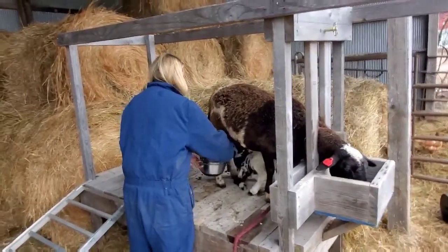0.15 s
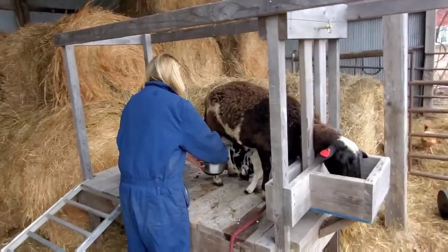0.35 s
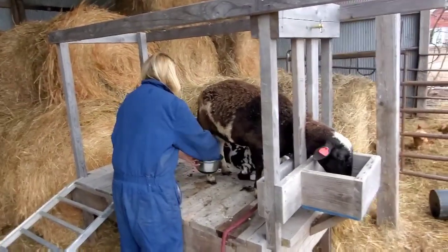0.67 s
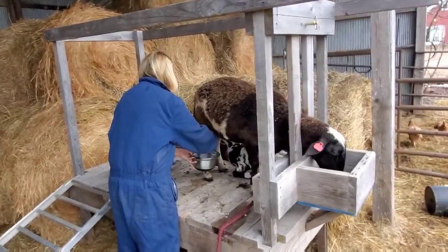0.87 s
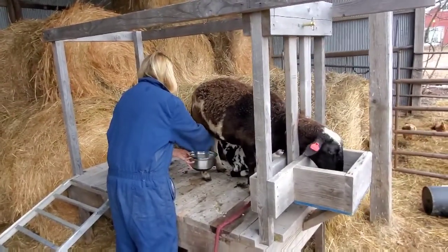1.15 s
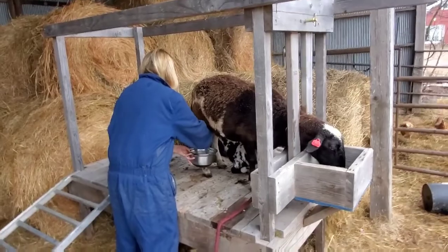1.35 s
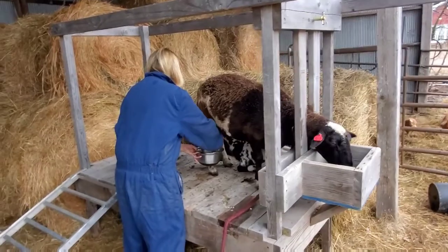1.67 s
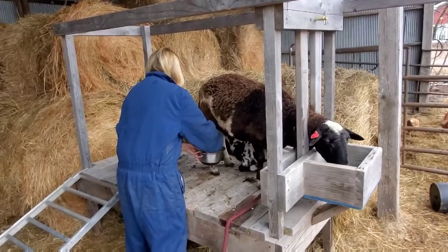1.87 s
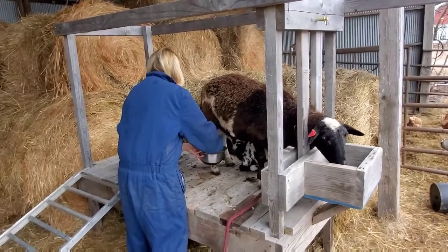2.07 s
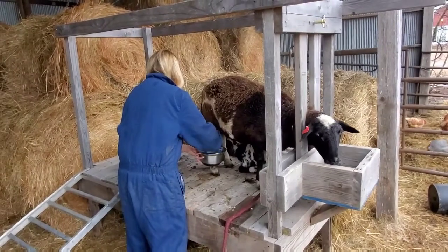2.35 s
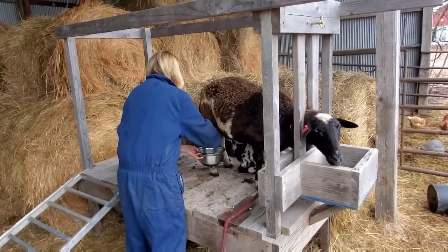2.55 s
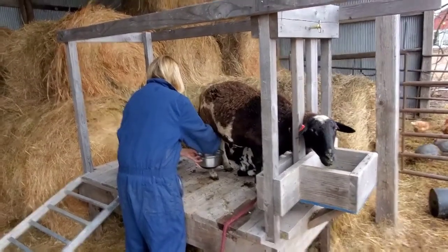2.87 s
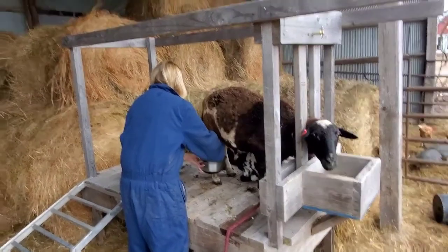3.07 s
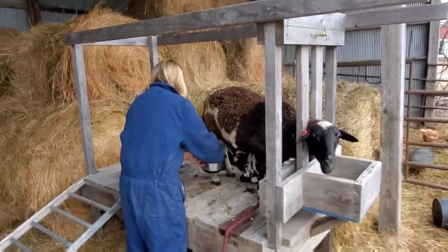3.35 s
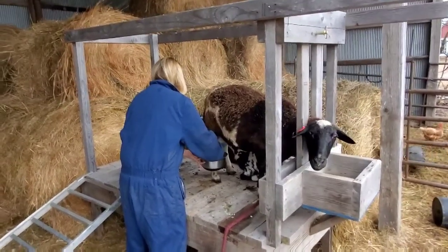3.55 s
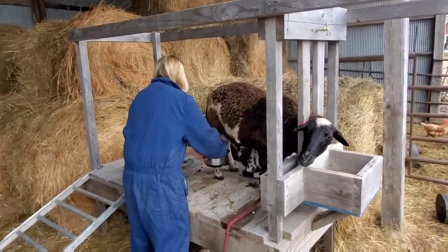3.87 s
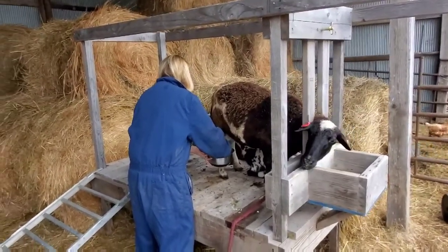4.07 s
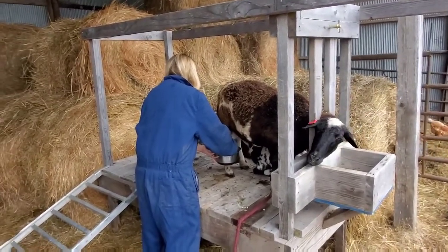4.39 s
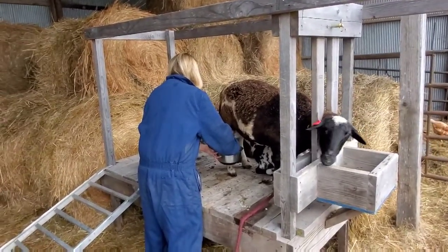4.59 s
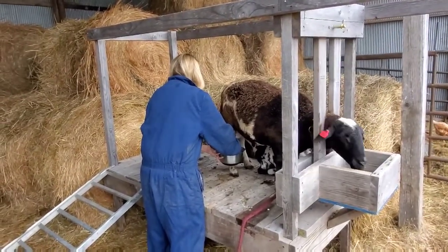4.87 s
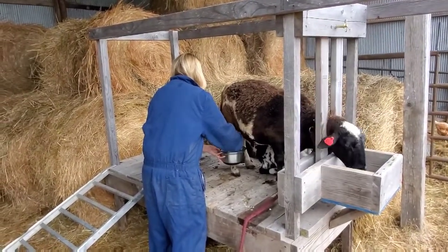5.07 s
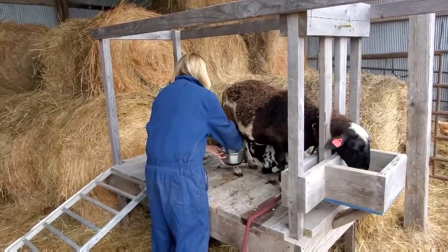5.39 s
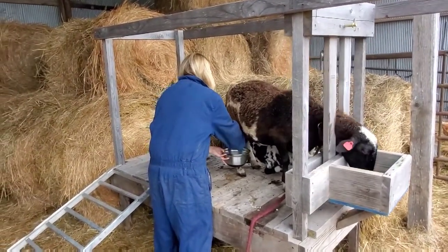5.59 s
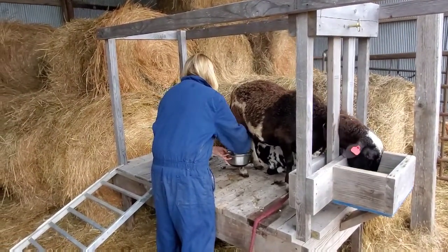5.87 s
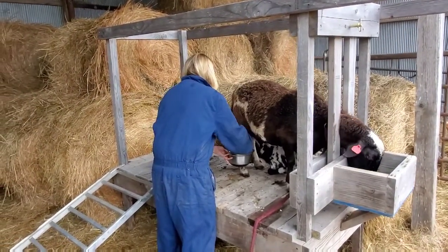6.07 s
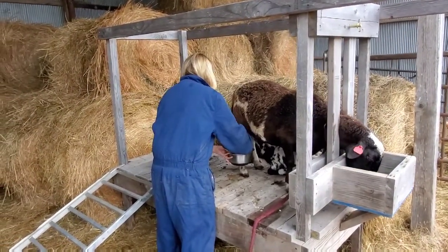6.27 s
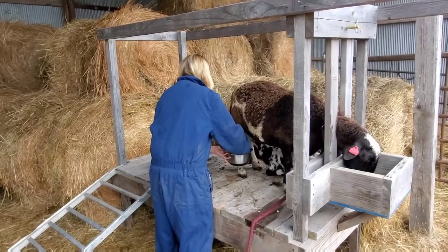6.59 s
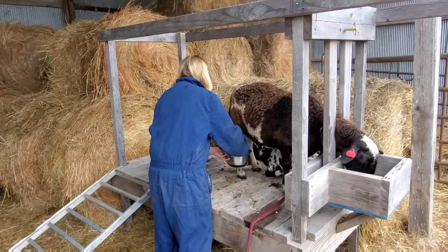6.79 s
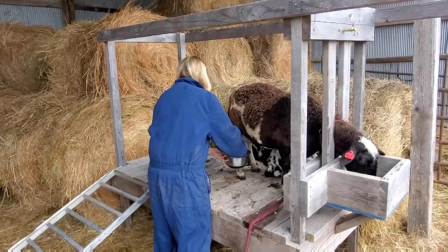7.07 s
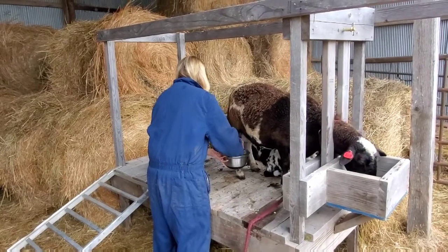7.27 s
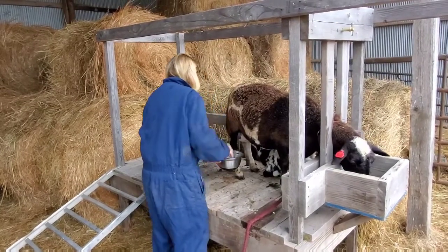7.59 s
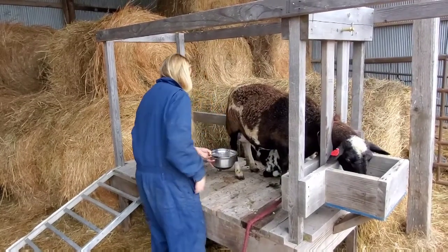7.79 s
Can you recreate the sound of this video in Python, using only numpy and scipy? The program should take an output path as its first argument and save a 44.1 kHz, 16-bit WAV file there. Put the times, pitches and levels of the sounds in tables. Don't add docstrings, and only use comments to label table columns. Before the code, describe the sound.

A quiet barn with soft air and a swelling low rumble, heard through two spaced microphones. Straw shuffles and ticks from the start. At about 0.5 to 1.3 seconds a lamb on the left gives a short, high, quavering bleat. Straw stirs and snaps follow; near 2.15 there is a brief thin squeak and a faint hiss of milk. From 2.4 to 3.1 a ewe on the right answers in a deep, rattling call that catches and restarts over a fluttering chest hum. The lamb overlaps its end with a long high cry, 3.2 to 4.4. The ewe calls again, shorter and rising, 4.4 to 4.9. The lamb's strongest, brightest bleat, with deep rapid quaver, runs 5.0 to 6.1. Then quiet: small straw ticks, and another faint milk hiss around 6.9. A shorter, fainter lamb bleat closes, 7.2 to 7.9. The tail is short, softened by hay.

```python
import sys
import numpy as np
from scipy import signal
from scipy.fft import next_fast_len
from scipy.io import wavfile
from scipy.ndimage import uniform_filter1d

SR = 44100
rng = np.random.default_rng(int(sys.argv[2]) if len(sys.argv) > 2 else 0)


def gain_from_db(level_db):
    decades = np.asarray(level_db, float) / 20
    return 10 ** decades


def wav_record(signal):
    frames = np.transpose(np.atleast_2d(signal))
    bounded = np.clip(frames, -1, 1)
    quanta = np.round(bounded * 32767).astype(np.int16)
    wavfile.write(sys.argv[1], SR, quanta)


N = 350154


def evened(x):
    return x / np.sqrt(np.mean(x ** 2) + 1e-20)


def read(points, hz):
    f, value = np.transpose(points)
    return np.interp(np.log(hz + 1), np.log(f + 1), value)


def add(mix, s, sound):
    part = mix[..., round(s * SR):][..., :sound.shape[-1]]
    part += sound[..., :part.shape[-1]]


def butter(x, order, hz, kind):
    return signal.lfilter(*signal.butter(order, hz, kind, fs=SR), x)


def resonate(x, hz, width):
    turn = np.exp(2j * np.pi * np.cumsum(hz * np.ones(len(x))) / SR)
    r = np.exp(-np.pi * width / SR)
    return 2 * (turn * signal.lfilter([(1 - r) ** 2], [1, -2 * r, r * r], x / turn)).real


def wander(n, size):
    return evened(uniform_filter1d(uniform_filter1d(rng.standard_normal(n), size), size))


def shelf(x, hz, db):
    return x + (gain_from_db(db) - 1) * butter(x, 1, hz, "high")


def ports(x, late, far):
    return np.array([x, np.concatenate([np.zeros(late), far])[:len(x)]])


# freq_hz, likeness
STEREO_LIKENESS = [(30, 0.68), (100, 0.77), (300, 0.97), (1000, 0.37), (4000, 0.086)]


def noise(spectrum, patchy_db):
    size, hop = 510, 170
    frames, hz = N // hop + 5, np.fft.rfftfreq(size, 1 / SR)
    a, b, c, d, patches = rng.standard_normal((frames, 256, 5)).T
    patches = evened(uniform_filter1d(uniform_filter1d(patches, 8, 0), 11, 1))
    same = np.clip(read(STEREO_LIKENESS, hz), -1, 1)[:, None]
    left, other = a + 1j * b, c + 1j * d
    z = np.array([left, same * left + np.sqrt(1 - same ** 2) * other])
    z *= gain_from_db(read(spectrum, hz)[:, None] + patchy_db * patches)
    return signal.istft(z, nperseg=size, noverlap=size - hop)[1][:, :N]


# freq_hz, density_db
HUSH_COLOUR = [(20, -4.5), (116, 11.5), (200, -19), (330, -5.5), (499, -5), (1530, -8), (2260, -16),
               (2530, -9), (2990, -20), (5850, -19), (9200, -33), (13500, -40), (16000, -50)]
# time_s, level_db
RUMBLE_SWELLS = [(0.0, -61), (0.37, -66), (0.62, -52.5), (0.73, -58), (2.01, -67.5), (2.81, -61),
                 (2.87, -53), (3.52, -62.5), (6.02, -58.5), (6.32, -74), (7.94, -63)]


def air():
    hush = gain_from_db(-60.5) * evened(noise(HUSH_COLOUR, patchy_db=2.2))
    rumble_colour = [(20, -24.5), (55, 6.0), (110, 5.5), (200, -7.0), (400, -24.5)]
    low = evened(noise(rumble_colour, patchy_db=3.5))
    s, db = np.transpose(RUMBLE_SWELLS)
    return hush + low * gain_from_db(np.interp(np.arange(N) / SR, s, db) + 4.0)


# start_s, held_s, shuffle_db, fizz_db
STRAW_STIRS = [(0.068, 0.12, -52.5, -61.5), (0.3, 0.14, -58, -68), (0.5, 0.58, -48, -66),
               (1.27, 0.012, -46.5, -52.5), (1.452, 0.024, -58.5, -67), (1.522, 0.029, -48, -56),
               (1.753, 0.049, -60, -53.5), (1.9, 0.075, -57, -63), (2.064, 0.11, -71, -61.5),
               (2.233, 0.01, -56, -58), (3.2, 0.32, -56, -60.5), (6.3, 0.026, -68.5, -71),
               (6.7, 0.017, -64, -102), (6.956, 0.011, -68, -67), (7.082, 0.071, -62, -72),
               (7.2, 0.13, -62, -76)]


def rustle():
    s, held, shuffle_db, fizz_db = np.transpose(STRAW_STIRS)[:, :, None]
    t = np.arange(0, N + 200, 200) / SR
    rise_db = -224 * np.maximum(s - t, 0)
    fall_db = -96 * np.maximum(t - s - held, 0)
    shape, at = gain_from_db(rise_db + fall_db), np.arange(N) / SR
    shuffles = np.interp(at, t, (gain_from_db(shuffle_db) * shape).max(0))
    fizzes = np.interp(at, t, (gain_from_db(fizz_db) * shape).max(0))
    dull_colour = [(120, -15), (300, -7.5), (550, -3.0), (1200, -20.5), (2500, -39.0), (6000, -66)]
    fizz_colour = [(800, 0.5), (2200, -1.5), (5000, -9.0), (9000, -17.0), (15000, -20)]
    dull = evened(noise(dull_colour, patchy_db=2.5))
    fizz = evened(noise(fizz_colour, patchy_db=1.2))
    grain = gain_from_db(1.8 * wander(N, size=60))
    return shuffles * dull + gain_from_db(4.5) * fizzes * grain * fizz


# start_s, peak_db, pitch_hz, left_right_db
STRAW_TICKS = [(0.058, -53, 600, -4), (0.088, -43, 6780, -0.5), (0.3336, -50, 5780, -2),
               (0.4434, -63, 5640, -3), (1.411, -36, 4500, -3), (1.633, -42, 5500, -8),
               (1.8394, -61, 4600, 1.0), (1.9137, -46, 5250, 5), (2.0577, -58, 5670, 5),
               (6.136, -41, 4500, 17), (6.2172, -51, 4620, 5.5), (6.256, -49, 5870, -2),
               (6.4877, -50.5, 7300, 15), (6.5444, -52, 7340, 0), (6.599, -61, 4900, 7),
               (6.6326, -57.5, 7430, 10), (6.71, -55, 6500, 12), (6.806, -49, 10900, -17),
               (6.867, -53, 7440, 5), (6.96, -40, 7200, 10), (7.0826, -47, 4680, 11),
               (7.1133, -53, 4500, -3), (1.267, -36, 10980, -11), (1.87, -56, 11900, 0),
               (2.292, -46, 11000, 0), (0.346, -45, 2500, 0.3), (0.387, -58, 11000, 0.3),
               (1.268, -49, 2590, 0.3), (1.596, -44, 350, -3), (6.96, -37, 2510, 7),
               (7.0823, -38, 700, 0.3), (7.056, -52, 6000, 0.3), (7.125, -54, 12000, 0.3),
               (7.212, -52, 6500, -2)]


def straw_ticks():
    out, t = np.zeros((2, N)), np.arange(300) / SR
    for s, db, hz, pan_db in STRAW_TICKS:
        crack = rng.standard_normal(len(t))
        snap = gain_from_db(-60 * t / .008) * (.7 * np.sin(2 * np.pi * hz * t) + .8 * crack)
        add(out, s, gain_from_db(db - 7.0) * snap * gain_from_db(np.array([[pan_db / 2], [-pan_db / 2]])))
    return out


# start_s, end_s, level_db, centre_hz, width_hz
HISSES = [(2.153, 2.296, -60, 6111, 5616), (6.87, 7.037, -61, 7400, 2400), (6.89, 6.96, -60, 6230, 240),
          (1.84, 2.05, -60.5, 1570, 410), (4.9, 5.01, -58, 4300, 2100), (6.399, 6.62, -85, 2000, 125),
          (0.058, 0.15, -67, 2800, 450), (7.02, 7.052, -67, 2400, 200), (7.115, 7.15, -69, 3140, 280),
          (6.708, 6.735, -69.5, 6500, 2300), (0.332, 0.36, -59.5, 2500, 4000)]


def hisses():
    out = np.zeros((2, N))
    for s, end, db, hz, width in HISSES:
        n = round((end - s) * SR)
        spray = []
        for _ in "lr":
            hiss = evened(resonate(rng.standard_normal(n), hz, width))
            spray.append(hiss * gain_from_db(2.0 * wander(n, size=150)))
        add(out, s, gain_from_db(db) * np.array(spray) * signal.windows.tukey(n, .3))
    return out


def voice(turns, hz, rough, sizes, throat, breath_hz, tilt_db, sway_db):
    overtones = np.arange(1, int(15500 / hz.max()))
    at, steps = np.arange(len(hz)), np.arange(0, len(hz) + 400, 400)
    chance = rng.standard_normal((len(overtones), len(steps)))
    sways = gain_from_db(sway_db * uniform_filter1d(chance, 3, 1) * np.sqrt(3))
    folds = sum(np.interp(at, steps, g) * np.cos(2 * np.pi * k * turns) for k, g in zip(overtones, sways))
    puffs = (0.083 + np.exp(-(turns % 1) / 3.8)) * rng.standard_normal(len(hz))
    puffs = shelf(shelf(evened(puffs), breath_hz, tilt_db), breath_hz, tilt_db) / gain_from_db(2 * tilt_db)
    drive = (np.sqrt(1 - rough) * evened(folds) + np.sqrt(rough) * puffs) * sizes
    return evened(sum((-1) ** k * gain_from_db(db) * resonate(drive, f, w) for k, (f, w, db) in enumerate(throat)))


# time_s, pitch_drop_hz, level_drop_db, rasp
QUAVER_DIPS = [(0.65, 26, 0, 0.3), (.733, 17, 0.5, 0.15), (0.804, 10, 2.5, 0.08), (.875, 17.2, 3.5, 0.15),
               (.955, 6.9, 1.5, 0), (1.077, 11.6, -0.5, 0.28), (1.142, 1.7, -3, 0.38),
               (1.222, 9.7, -5.5, 0.64), (3.342, 23.7, -2.5, 0.47), (3.413, 9.1, 1.5, 0),
               (3.502, 14.6, 1.5, 0.35), (3.599, 3.1, 3, 0.01), (3.799, 7.4, -1.5, 0),
               (3.849, 0.44, -1.5, 0.08), (4.225, 12.8, -0.5, 0.8), (5.083, 16, 3, 1),
               (5.157, 26.4, 2, 0.24), (5.228, 11.8, -1.5, 0.7), (5.297, 16.5, -1, 0.37),
               (5.365, 16.3, 2.5, 0.22), (5.433, 23, 5, 0.27), (5.502, 28, 3, 0.37),
               (5.57, 20.3, 2.5, 0.27), (5.644, 20, 1.5, 0.26), (5.722, 23.2, 2.5, 0.13),
               (5.802, 11.6, 4, 0.28), (5.87, 12, 4, 0.32), (5.946, 7, 1, 0), (7.34, 18.3, -1, 0.45),
               (7.429, 10.4, 4, 0.03), (7.511, 5.7, 1.5, 0.32), (7.6, 4.6, 0.5, 0.32),
               (7.686, 6.1, 2, 0.29), (7.756, 7, 2.5, 0.37), (7.829, 3, 1, 0.15)]
# freq_hz, width_hz, level_db
LAMB_RESONANCES = [(370, 330, -51), (2043, 1140, -10), (2334, 910, -8), (6430, 1760, -20), (7460, 370, -13),
                   (8220, 2560, -26), (11130, 1060, -25), (14600, 21000, -37)]


def bleat(rows, mouth, nose, tongue, wave, bright_db, shadow_db, nasal_db, breath_db):
    s, *columns = np.transpose(rows)
    t = np.arange(s[0], s[-1], 1 / SR)
    n = len(t)
    effort_db, hz = (np.interp(t, s, c) for c in columns)
    when, *shape = np.transpose(mouth)
    jaw_hz, jaw_db, lip_hz = (np.interp(t, when, c) for c in shape)
    hoarse, narrows_s, narrow_db, mouth_air_db = nose
    nasal_db = nasal_db + narrow_db / (1 + np.exp((narrows_s - t) / 0.027))

    slack = np.maximum(np.median(hz) - hz, 0) / 48
    faint_db = np.median(effort_db) - effort_db
    rough = np.clip(.11 + .5 * slack ** 2 + faint_db / 42, 0, np.where(t < t[0] + .05, .3, .7))
    inside = [q for q in QUAVER_DIPS if s[0] < q[0] < s[-1]]
    at, drop_hz, drop_db, rasp = np.transpose(inside)[:, :, None]
    steep = np.where(t < at, 2.8, 1.6)
    dips = np.exp(-(steep * (t - at) / .035) ** 2 * np.log(2))
    rasps = (np.abs(rasp) * dips ** 1.5).sum(0)
    gape = np.maximum(lip_hz - 4850, 0) / 1600
    rough = np.clip(abs(hoarse) + 2 * rough ** 2 + rasps + gape, 0, .9)
    tremble = (.001 + .035 * rough) * wander(n, size=120) + .002 * wander(n, size=450)
    hz = (hz - (drop_hz * dips).sum(0)) * (1 + tremble)
    turns = np.cumsum(hz) / SR
    sizes = gain_from_db((0.6 + 2.6 * rough) * wander(n, size=150))

    lip_db = -.6 - 1.26 * np.maximum(faint_db - 1.5, 0) * (t > np.mean(t))
    lip_width = 520 + .6 * np.maximum(lip_hz.max() - 4800, 0)
    closed = (t < t[0] + .1) * np.clip(-.034 * (effort_db + 30.5), 0, .45)
    tongue_hz, *rest = tongue
    chest, *upper = LAMB_RESONANCES
    flare = (5600, 800, -26.5 + 0.0584 * (lip_hz - 4850.0))
    throat = [chest, (760, 250, nasal_db + 11.5), (jaw_hz, 260, jaw_db + 3.5), *upper[:2],
              (tongue_hz * (1 - closed), *rest), (lip_hz, lip_width, lip_db), *upper[2:], flare]
    x = voice(turns, hz, rough, sizes, throat, breath_hz=3850, tilt_db=15, sway_db=1.5)
    x = shelf(x, 7770, bright_db + 0.025 * (lip_hz - 4700))
    hum_db = -25.5 - 0.78 * (effort_db + 21.5) + 3 * wander(n, size=900)
    x = x + gain_from_db(hum_db) * sizes * np.sin(2 * np.pi * turns)
    windpipe = evened(resonate(rng.standard_normal(n), 470, 550))
    mouth_air = evened(resonate(rng.standard_normal(n), 864, 220))
    x = x + gain_from_db(breath_db) * windpipe + gain_from_db(mouth_air_db) * sizes * mouth_air
    fade = signal.windows.tukey(n, .03)
    x = x * gain_from_db(effort_db - (drop_db * dips).sum(0)) * fade
    hiss = evened(butter(rng.standard_normal((2, n)), 2, [7000, 13000], "band"))
    hiss = hiss * gain_from_db(effort_db - 33.5 + bright_db) * fade

    third = signal.hilbert(resonate(x, 3 * hz, 120), next_fast_len(n))[:n]
    when, wave_db, turn = np.transpose(wave)
    shift = gain_from_db(np.interp(t, when, wave_db)) * np.exp(1j * np.interp(t, when, turn))
    near = x + (third * (shift - 1)).real
    far = x + (gain_from_db(5) - 1) * third.real
    return ports(near, late=20, far=gain_from_db(-4.5) * shelf(far, 5400, shadow_db)) + hiss * gain_from_db([[0], [-4]])


# time_s, effort_db, pitch_hz
LAMB_BLEATS = [
    [(0.52, -47, 305), (0.56, -41.5, 312.3), (0.61, -29.5, 366.2), (0.8, -23, 367.2), (1.05, -27.5, 363.3),
     (1.14, -26.5, 361.7), (1.16, -31, 341.5), (1.225, -31.5, 337.7), (1.3, -51, 281)],
    [(3.21, -45.5, 299.3), (3.26, -50.5, 328), (3.29, -31, 370), (3.5, -23, 386.4), (3.75, -22.5, 396.5),
     (4.18, -21.5, 383.6), (4.28, -21.5, 361), (4.325, -32.5, 326), (4.38, -55, 313)],
    [(4.985, -50, 316), (5.01, -37.5, 338.7), (5.04, -26, 366.6), (5.4, -21, 378.6), (5.78, -22, 381.6),
     (5.85, -21, 359.9), (5.98, -23, 368.6), (6.03, -23.5, 323), (6.09, -53, 328)],
    [(7.215, -51, 297), (7.25, -35, 310.3), (7.275, -43, 311), (7.31, -31, 367.3), (7.45, -27, 350.1),
     (7.81, -27, 353.5), (7.835, -29, 336.3), (7.89, -31, 322), (7.935, -43, 318)],
]
# time_s, jaw_hz, jaw_db, lip_hz
LAMB_MOUTHS = [
    [(.52, 1010, -14, 4600), (.62, 1120, 5.5, 5120), (.7, 1260, 0.5, 4910), (.8, 1270, -0.5, 4640),
     (.95, 1287, 1.5, 4500), (1.12, 1248, -11.5, 4620), (1.21, 1290, 0.5, 4483), (1.3, 1300, -11.5, 4460)],
    [(3.21, 980, -26, 4840), (3.3, 1090, 10, 5110), (3.35, 1170, 5, 5084), (3.53, 1250, 5.5, 4913),
     (3.85, 1227, 2, 4670), (4.0, 1250, 3.5, 4360), (4.15, 1265, 2, 4420), (4.29, 1240, -4.5, 4470),
     (4.38, 1306, 22, 4460)],
    [(4.985, 970, -13, 5110), (5.03, 1060, 2.5, 4760), (5.1, 1187, 6, 5000), (5.23, 1155, 0.5, 4700),
     (5.6, 1180, 6, 4676), (5.8, 1151, 5.5, 4720), (5.97, 1188, -4.5, 4540), (6.09, 1320, 19.5, 4765)],
    [(7.215, 950, -9, 4460), (7.3, 1095, 6, 5170), (7.38, 1205, 2.5, 4990), (7.46, 1210, 3, 4884),
     (7.73, 1260, 3, 4755), (7.935, 1210, 7.5, 4690)],
]
# hoarseness, narrows_s, narrow_db, mouth_air_db
LAMB_NOSES = [
    (0.08, 0.8, -10, -21),
    (0.04, 3.876, -13.5, -39),
    (0.1, 4.2, -5.5, -24),
    (0.07, 10, 2.5, -22),
]
# freq_hz, width_hz, level_db
LAMB_TONGUES = [(3320, 910, -3), (3340, 880, -3), (3287, 700, 0), (3260, 940, -3.5)]
# time_s, level_db, phase_turn_rad
STALL_WAVES = [
    [(.52, 3, 0.1), (.72, 5.5, 0), (.88, 2.5, -.5), (1.0, 7, -0.4), (1.15, 11, -0.13), (1.3, 3, -0.11)],
    [(3.21, -11, 0), (3.42, -7.5, 1.3), (3.5, -9, -2.4), (3.58, -7.5, -2.5), (3.66, -1.5, -6),
     (3.76, 1, -6), (3.98, 0.5, -7), (4.06, -13.5, -7.5), (4.22, 1.5, -5.5)],
    [(4.985, 0, -0.61), (5.17, 2.5, -0.69), (5.41, -9, 0.061), (5.65, -1.5, 0.5), (5.8, -8, 0.23),
     (5.89, 1.5, -0.43), (6.09, 8, 0.082)],
    [(7.215, 2, -0.46), (7.5, 2, -0.35), (7.74, 3, -0.25), (7.935, 1.5, -0.25)],
]
# bright_db, far_shadow_db, nasal_db, low_breath_db
HEAD_TURNS = [
    (2, -1.5, -17, -27.5),
    (5.5, -14, -12, -30.5),
    (7.5, -7, -12.5, -27),
    (6, -5.5, -17, -28),
]


def lamb():
    out = np.zeros((2, N))
    settings = zip(LAMB_BLEATS, LAMB_MOUTHS, LAMB_NOSES, LAMB_TONGUES, STALL_WAVES, HEAD_TURNS)
    for rows, *shape, head in settings:
        add(out, rows[0][0], bleat(rows, *shape, *head))
    return out


# freq_hz, t60_s
BARN_DECAY = [(150, 0.74), (600, 0.43), (1300, 0.32), (2000, 0.41), (5000, 0.28), (12000, 0.0073)]


def barn(x):
    taps = np.zeros((2, SR // 2))
    at = np.arange(160, SR // 2 - 20, 20) + rng.integers(0, 20, (2, (SR // 2 - 161) // 20))
    np.put_along_axis(taps, at, rng.choice([-1., 1.], at.shape), 1)
    hz, t, z = signal.stft(taps, SR, nperseg=256)
    tail = signal.istft(z * gain_from_db(-60 * t / read(BARN_DECAY, hz)[:, None]), SR, nperseg=256)[1]
    return signal.fftconvolve(x, tail / np.linalg.norm(tail[0]), axes=1)[:, :N]


# freq_hz, level_db
SQUEAK_PARTIALS = [(2859, -66), (4344, -76), (5426, -79), (6121, -76), (7763, -73)]


def squeak():
    out, t = np.zeros((2, N)), np.arange(round(.085 * SR)) / SR
    for hz, db in SQUEAK_PARTIALS:
        tone = np.sin(2 * np.pi * hz * (t - 0.089 * t * t)) * signal.windows.tukey(len(t), .3)
        add(out, 2.142, gain_from_db(db + 7 + 4 * wander(len(t), size=120)) * tone)
    return out


# time_s, lull_before_db, hum_swell_db
FOLD_CATCHES = [(2.403, 6, 9), (2.428, -12, 3), (2.447, 3.5, 9), (2.473, 12, -8), (2.503, 8, 3),
                (2.539, 3.5, 0), (2.565, 12.5, -3), (2.587, 2, 5), (2.612, 21, -1), (2.636, 11, -2),
                (2.676, -4, 6), (2.705, 9, -5), (2.744, 7, 5), (2.781, 12, 4.5), (2.834, 3, 4),
                (2.862, 3.5, -2), (2.909, 1, 0), (2.972, -2.5, 4.5), (3.012, 5, 1), (3.05, -4, 0),
                (4.41, 0, 3), (4.46, 13, -6), (4.493, 12, 4.5), (4.536, 16, -8), (4.572, 3, 8),
                (4.622, 4, 0), (4.654, 4, 6), (4.695, 3, 3), (4.735, -4, 2.5), (4.784, 3, 5.5),
                (4.839, 0.5, 8.5), (4.869, -9, 3), (4.9, 2.5, 9)]
# freq_hz, width_hz, level_db
EWE_RESONANCES = [(208, 78, 10.5), (563, 284, 5), (950, 800, -1), (1335, 296, 4), (2190, 750, -3),
                  (3000, 810, -19.5), (4620, 530, -16), (5500, 6600, -29.5)]


def ewe_call(rows, lead_s, late):
    s, *columns = np.transpose(rows)
    t = np.arange(s[0], s[-1], 1 / SR)
    n = len(t)
    effort_db, hz, mouth_hz, nose_hz = (np.interp(t, s, c) for c in columns)
    at, lull_db, swell_db = np.transpose([c for c in FOLD_CATCHES if s[0] < c[0] < s[-1]])
    led = t + lead_s
    beyond = (led - np.clip(led, at[0], at[-1])) / .038
    beat = np.interp(t, at - lead_s, np.arange(len(at))) + beyond
    hz = hz * (1 - .04 * np.cos(2 * np.pi * beat))
    steady = np.cumsum(hz * (1 + .055 * wander(n, size=500))) / SR
    turns = np.cumsum(hz * (1 + .052 * wander(n, size=150) + .015 * wander(n, size=600))) / SR
    hard = at[lull_db > 4]
    hard_turns = np.interp(hard, t, turns)
    turns = turns + np.interp(t, hard, np.round(hard_turns) - hard_turns)

    edges = np.concatenate([[s[0]], at - .003, [s[-1]]])
    since = np.interp(t, edges, np.arange(len(edges)))
    lull = np.append(lull_db, 2.)[np.minimum(since.astype(int), len(at))]
    fade_db = -1.1 * lull * (since % 1 - .4)
    per_pulse_db = 2.4 * rng.standard_normal(200)[np.round(turns).astype(int) % 200]
    mouth = (mouth_hz, 300, 6.0 + 12 * (.5 - since % 1))
    _, nose_width, nose_db = EWE_RESONANCES[6]
    nose = (nose_hz, nose_width, nose_db + 0.24 * (effort_db + 28.5))
    throat = [*EWE_RESONANCES[:4], mouth, *EWE_RESONANCES[4:6], nose, *EWE_RESONANCES[7:]]
    x = -voice(turns, hz, .25, gain_from_db(fade_db + per_pulse_db), throat, breath_hz=1800, tilt_db=9, sway_db=1.5)
    x = signal.lfilter(*signal.iirnotch(2530, 4.9, SR), x)
    boards = np.bincount([0, 65, 130, 190, 250], [1, -.3, .35, -.35, .3])
    x = evened(signal.lfilter(boards, 1, x))
    rush = evened(butter(rng.standard_normal(n), 2, 5500, "high"))
    x = x + gain_from_db(fade_db - 34) * (0.36 + np.exp(-(turns % 1) / .25)) * rush

    second = .68 * np.sin(2 * np.pi * (steady + beat))
    hum = evened(resonate(np.sin(2 * np.pi * steady) - second, 160, 240))
    hum_db = -11 - 0.42 * (effort_db + 24.5) + np.interp(t, at - .005, swell_db)
    x = (x + gain_from_db(hum_db) * hum) * gain_from_db(effort_db) * signal.windows.tukey(n, .012)
    return ports(x, late=late, far=x)[::-1]


# time_s, effort_db, pitch_hz, mouth_hz, nose_hz
EWE_CALLS = [
    [(2.398, -45.5, 107.7, 1430, 5250), (2.46, -42, 104, 1460, 5140), (2.57, -34, 119.7, 1500, 4430),
     (2.646, -30, 131.6, 1534, 4530), (2.906, -27, 134.9, 1605, 4630), (2.964, -30.5, 141.2, 1630, 4730),
     (2.982, -27.5, 129.9, 1580, 4540), (3.06, -31, 127.1, 1889, 4620), (3.09, -44, 130, 1760, 4540)],
    [(4.375, -42, 115, 1387, 4490), (4.417, -40.5, 118.6, 1460, 4660), (4.45, -40.5, 109.7, 1680, 4850),
     (4.5, -33.5, 112.9, 1670, 5100), (4.583, -28.5, 127.6, 1670, 5300), (4.7, -27.5, 133.5, 1626, 4600),
     (4.82, -26.5, 138.3, 1755, 4340), (4.89, -34.5, 135, 2060, 4300), (4.93, -62, 131, 1920, 4300)],
]
HUM_LEADS = [-0.0098, -0.0111]
LEFT_LAGS = [8, 9]


def ewe():
    out = np.zeros((2, N))
    for rows, *timing in zip(EWE_CALLS, HUM_LEADS, LEFT_LAGS):
        add(out, rows[0][0], ewe_call(rows, *timing))
    return out


def scene():
    young, mother = lamb(), ewe()
    sent = gain_from_db(-14) * young[:1] + gain_from_db(-15) * mother[1:]
    sent = butter(sent, 2, 260, "high")
    quiet = air() + rustle() + straw_ticks() + hisses() + squeak()
    return young + mother + barn(sent) + quiet


def roll_off(x):
    return signal.sosfilt(signal.butter(12, 16510, fs=SR, output="sos"), x)


def record(dry):
    treble_limit = signal.firwin(511, 16050, window=("kaiser", 9), fs=SR)
    limited = signal.oaconvolve(dry, treble_limit[None], "same")
    return roll_off(butter(limited, 2, 38, "high"))


dry = scene()
out = record(dry)
wav_record(out)
```